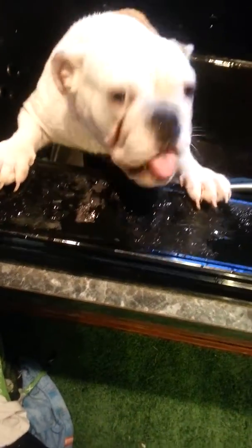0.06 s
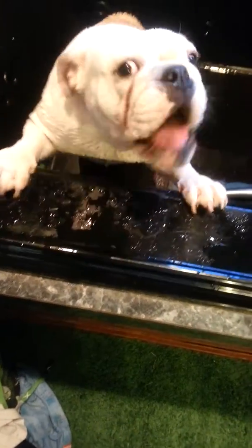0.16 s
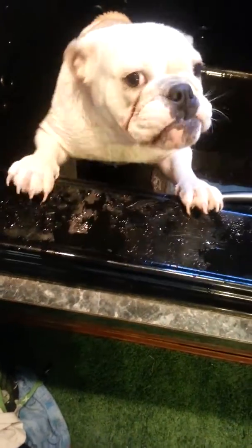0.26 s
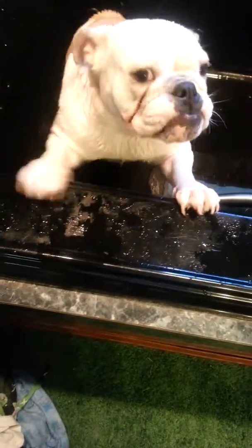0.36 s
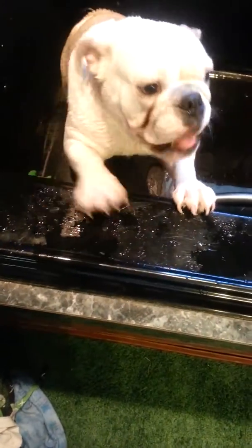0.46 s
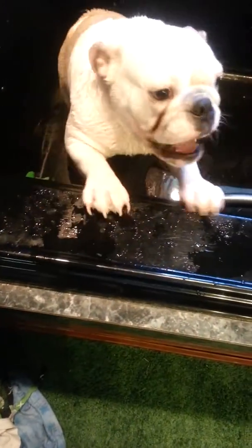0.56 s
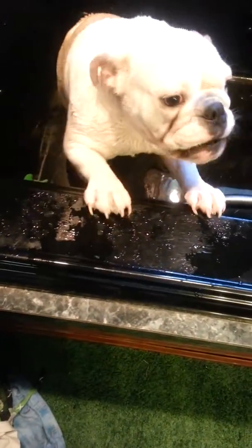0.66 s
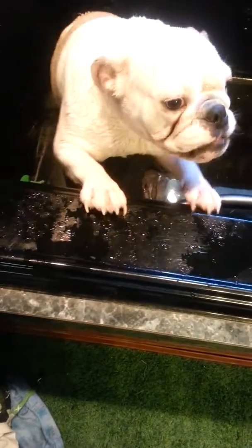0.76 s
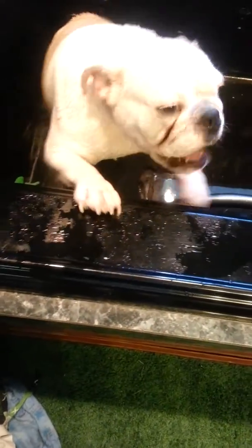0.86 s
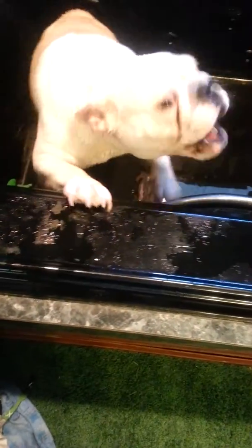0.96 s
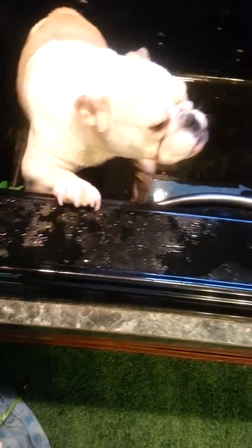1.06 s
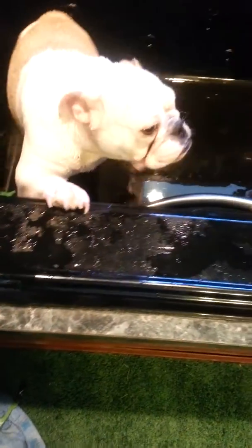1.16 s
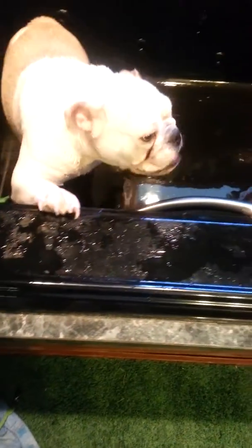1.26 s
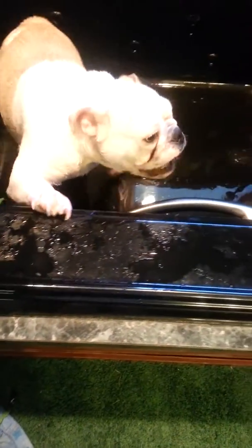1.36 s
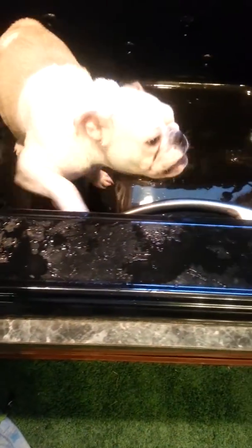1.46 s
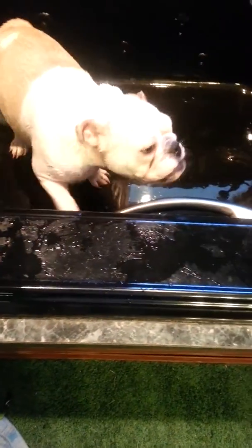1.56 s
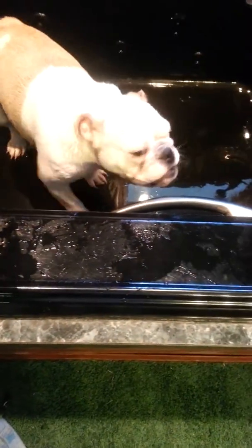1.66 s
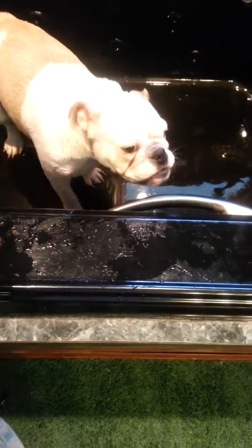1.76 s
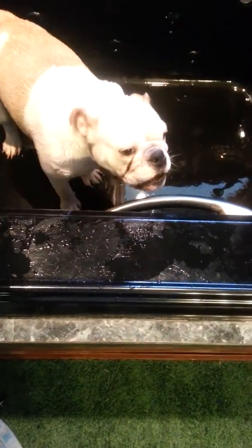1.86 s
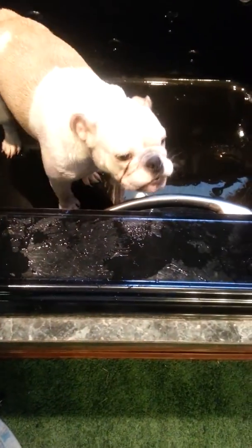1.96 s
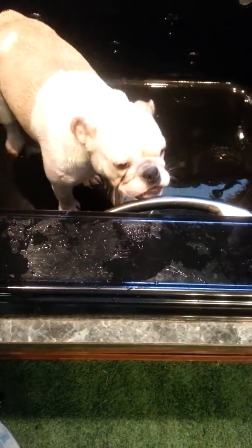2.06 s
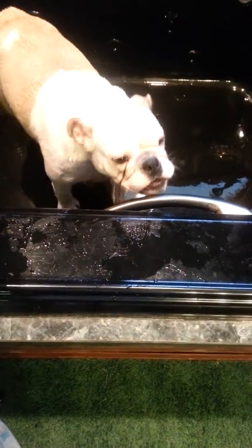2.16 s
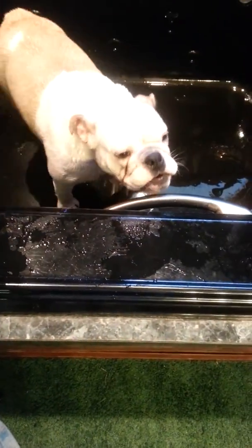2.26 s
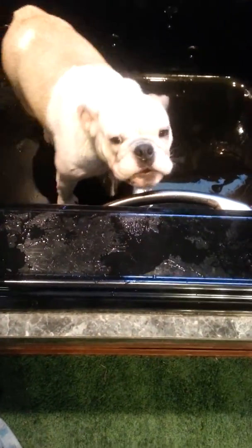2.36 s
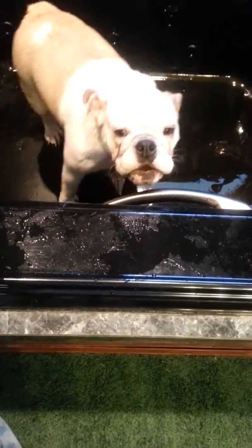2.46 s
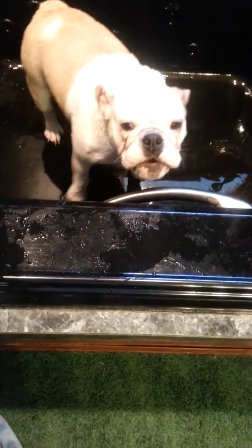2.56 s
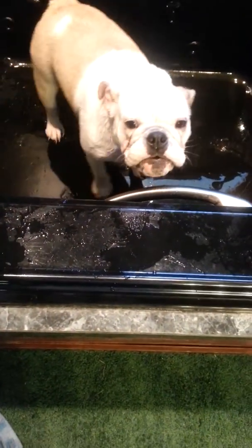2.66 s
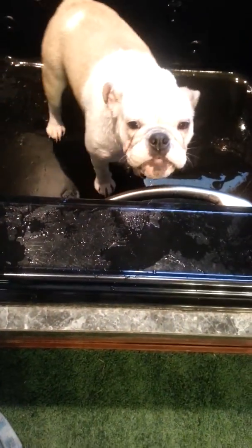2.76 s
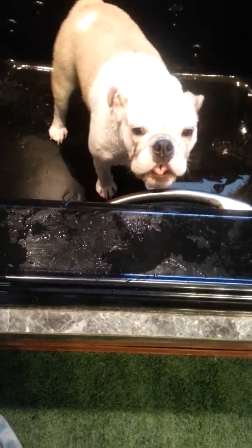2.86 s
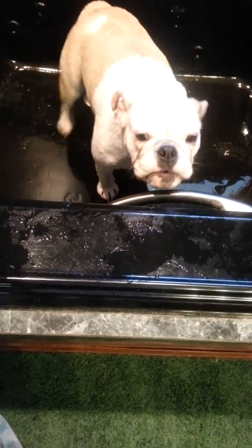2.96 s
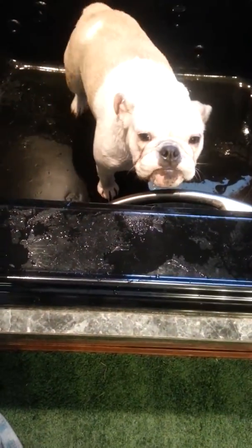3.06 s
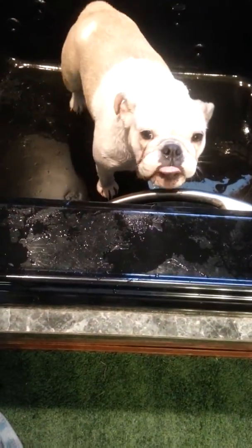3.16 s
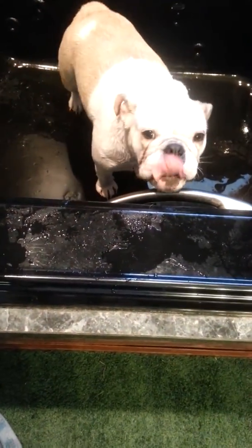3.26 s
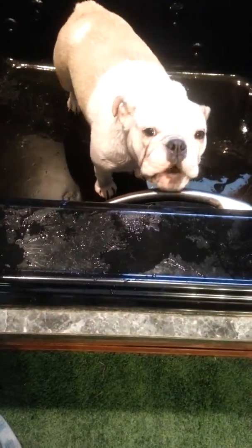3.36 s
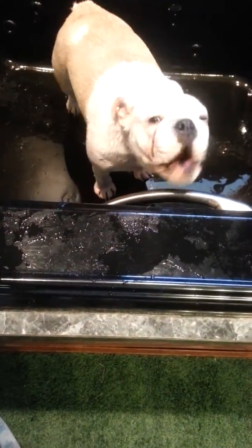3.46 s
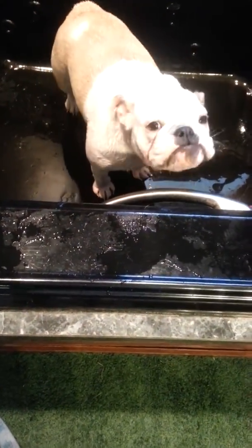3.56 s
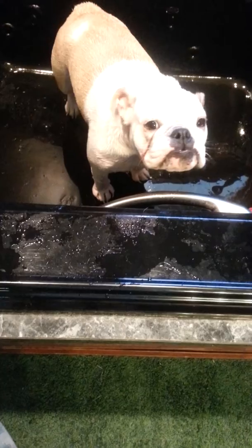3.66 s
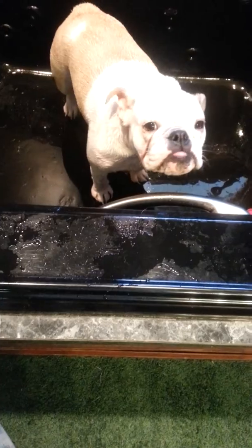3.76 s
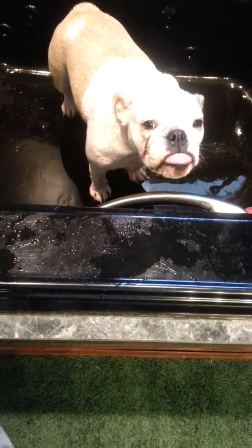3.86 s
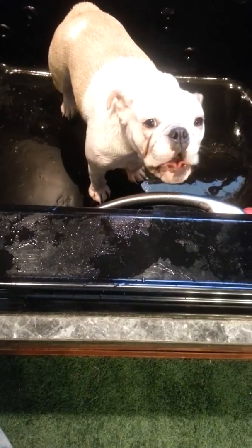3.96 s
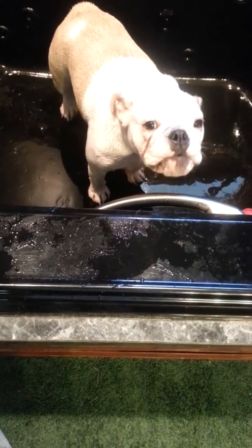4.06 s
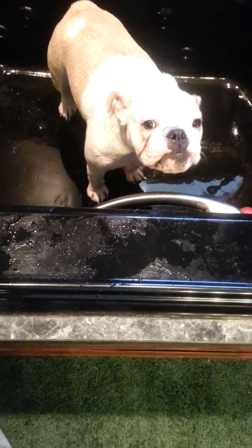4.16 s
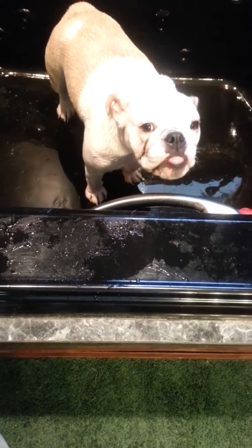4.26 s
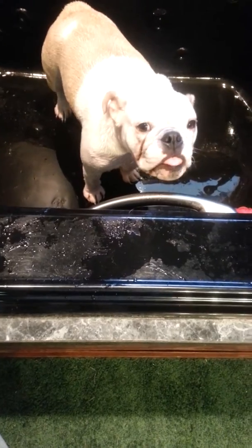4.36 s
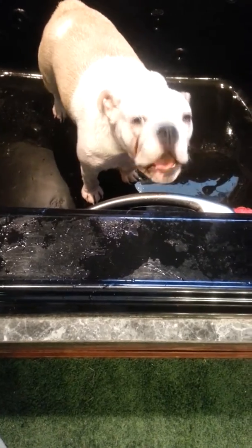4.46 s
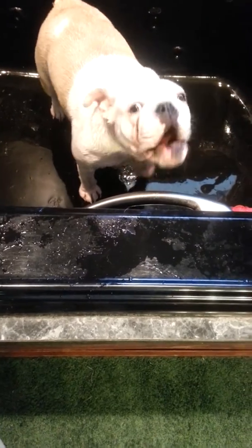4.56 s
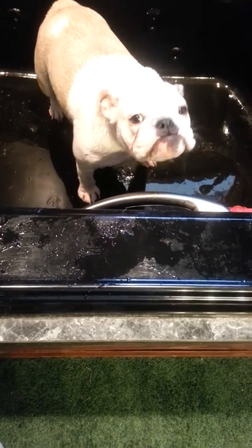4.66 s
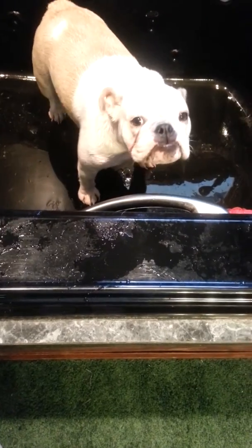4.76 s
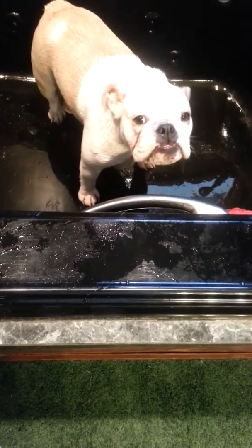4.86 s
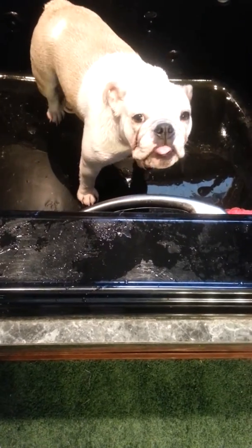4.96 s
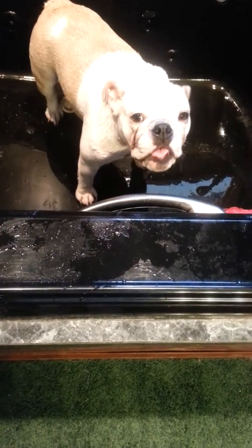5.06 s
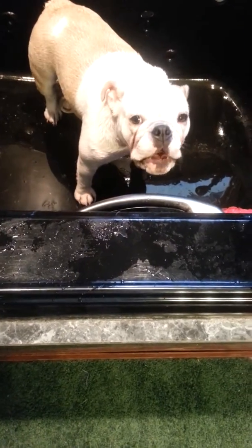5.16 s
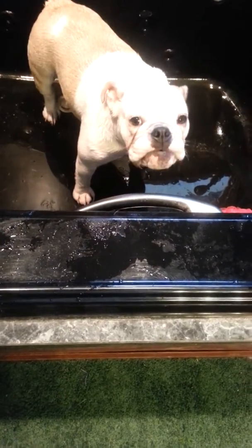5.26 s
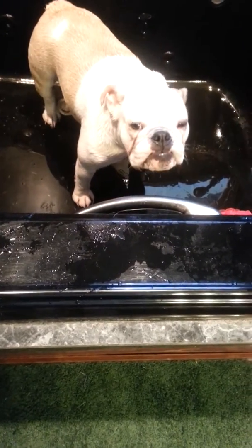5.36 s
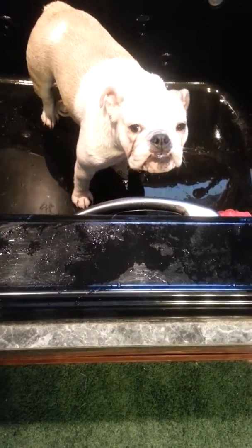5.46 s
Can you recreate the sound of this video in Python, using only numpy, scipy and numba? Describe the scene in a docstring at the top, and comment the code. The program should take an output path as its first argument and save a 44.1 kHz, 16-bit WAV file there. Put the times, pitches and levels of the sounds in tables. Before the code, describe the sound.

Four sharp puppy yaps, a rough fluttering whine and wet snuffling breaths between them, in a small reverberant bathroom.

```python
"""A bulldog puppy in a bathtub snorts and barks twice, whines, then barks twice more in a hard-walled bathroom.
Rough vocal-fold pulses and air ring throat, mouth and head; low pops lead the barks, the soft palate flaps in the whine.
Air bursts make snorts and filtered noise makes snuffles between calls; a resonant low drone trails whine and last bark.
Throughout, dense echoes ring on over a quiet noise bed; loud calls push the gain control and can clip."""
import sys
import numpy as np
from scipy import signal
from scipy.fft import rfft, irfft
from scipy.io import wavfile
from scipy.ndimage import uniform_filter1d
from numba import njit

SR = 44100
rng = np.random.default_rng(int(sys.argv[2]) if len(sys.argv) > 2 else 0)


def wav_record(signal):
    """Record a signal, one row per channel, as 16-bit PCM in the file named by sys.argv[1]."""
    frames = np.transpose(np.atleast_2d(signal))
    bounded = np.clip(frames, -1, 1)
    # unit amplitude maps onto the largest positive 16-bit level
    quanta = np.round(bounded * 32767).astype(np.int16)
    wavfile.write(sys.argv[1], SR, quanta)


N = 242991  # length in samples

# Levels in the tables are relative.
# Room noise colour. Each row: frequency in Hz, level per Hz in dB.
HOUSE_COLOUR = [(35, -25), (60, -9.5), (164, -16), (427, -15.5), (736, -21.5), (1800, -27), (2500, -30.5),
                (9240, -37), (11000, -24.5), (14300, -64), (22000, -120)]
# Echo bands of tub and walls. Each row: centre in Hz, time to fall 60 dB in seconds, level in dB.
ECHO_BANDS = [(255, 0.1, 1), (776, 0.47, 3.5), (1710, 0.33, 10.5), (5560, 0.22, 7.5), (12200, .35, -29)]
# A low wavering drone, perhaps from the chest: two passages. Each row: time in seconds, pitch in Hz, level in dB.
DRONE_PASSAGES = [
    [(2.6, 228.5, -22), (2.664, 221, -36), (2.706, 190, -32.5), (2.778, 168.5, -31), (2.97, 147, -79)],
    [(4.88, 158.2, -40.5), (5.062, 173, -67.5), (5.102, 192, -52), (5.216, 209, -56.5), (5.258, 166, -71.5),
     (5.32, 170, -84)],
]
# Puffs through the narrow nostrils. Each row: loudest moment in seconds, rise in seconds, fall in seconds,
# hiss in dB, nose resonance in dB, rumble in dB.
NOSTRIL_PUFFS = [(0.32, 0.16, 0.067, -28, -54, -43), (0.53, 0.3, 0.28, -45.5, -63, -50),
                 (0.644, 0.11, 0.024, -36.5, -26, -34), (1.17, 0.15, 0.069, -33, -35.5, -39.5),
                 (1.41, 0.053, 0.03, -83, -46, -43), (1.515, 0.11, 0.09, -31, -38.5, -40),
                 (2.86, 0.052, 0.092, -66.5, -59, -50), (3.066, 0.044, 0.14, -55.5, -61.5, -62),
                 (3.3, 0.077, 0.041, -64, -66.5, -53.5), (3.375, 0.04, 0.022, -64, -39.5, -61),
                 (3.66, 0.053, 0.05, -33, -40, -50), (3.93, 0.014, 0.083, -40, -52, -54.5),
                 (4.03, 0.12, 0.15, -61.5, -51.5, -48), (4.33, 0.12, 0.058, -63, -61.5, -73.5),
                 (4.72, 0.053, 0.077, -32, -35.5, -41), (4.86, 0.05, 0.046, -38, -57, -47.5),
                 (5.05, 0.093, 0.08, -65, -62, -63.5), (5.5, 0.15, 0.044, -45.5, -50, -61.5)]
# Short snorts. Each row: start in seconds, level in dB, mouth in Hz, nose in dB, time to fall 60 dB in seconds.
SNORT_BURSTS = [(0.059, -31.5, 570, -12, 0.28), (0.071, -24, 570, -5, 0.1), (0.464, -13, 604, -7, 0.015),
                (0.513, -13.5, 786, -2.5, 0.021), (0.562, -17, 910, -22, 0.027),
                (0.585, -24, 723, -18, 0.16), (0.656, -5, 545, -46, 0.016),
                (1.294, -26.5, 577.8, -30, 0.059), (1.323, -33, 706, -31, 0.055),
                (1.342, -27.5, 764, -20, 0.088), (1.413, -20, 482, -44, 0.054),
                (1.436, -22, 432.4, -8, 0.02), (3.026, -31.5, 440, -23, 0.079),
                (3.059, -36.5, 473, -1, 0.04), (3.178, -40.5, 840, -12, 0.05),
                (3.345, -31, 612, -21.5, 0.078), (3.925, -39.5, 880, 11, 0.033),
                (3.966, -26.5, 752, -16.5, 0.035), (4.024, -22, 575, -24, 0.033),
                (4.102, -29, 421, -26, 0.061), (4.199, -43.5, 628.2, -31, 0.05),
                (4.448, -27.5, 870, -11, 0.22), (4.861, -34, 516, -28.5, 0.076)]
# The soft palate shuts, then lets a puff of voice go. Each row: puff start in seconds, puff level in dB,
# gain when shut in dB (above 0: it stays open).
PALATE_FLAPS = [(1.595, -24.5, -16), (1.636, -16.5, -0.5), (1.675, -7.5, -23.5), (1.709, -8.5, -21),
                (1.754, -7.5, -15), (1.789, -18, -18), (1.817, -11, 1.5), (1.905, -19.5, 13.5),
                (1.982, -16, 4.5), (2.068, -20.5, -16.5), (2.13, -14.5, -11.5), (2.166, -1.5, -9),
                (2.244, -23.5, -9), (2.288, -3.5, -8), (2.392, -5, -18.5), (2.521, -9.5, -6),
                (2.589, -1, -7), (2.631, 1.5, -18.5), (2.698, -1, -33.5), (2.725, -25.5, -7.5)]
# Path of the whine. Each row: time in seconds, pitch in Hz, level in dB, upper mouth in Hz and dB,
# rasp in Hz and dB, lower mouth in dB, middle mouth in dB, roughness from 0 to 1.
WHINE_PATH = [(1.56, 504.6, -17, 2600, -8, 4310, -8, 2.5, -8.5, 0.26),
              (1.596, 506, -2, 2860, 0, 4140, -13, -14, -10, 0.19),
              (1.634, 663.7, -8, 2880, -4, 4550, -9.5, -11.5, -10, 0.2),
              (1.794, 566.8, -17, 2615, -25, 4060, -33.5, -10, -47.5, 0.2),
              (1.858, 645.6, -12, 2770, -0.5, 4140, -6, -8.5, -7.5, 0.37),
              (1.916, 803.7, -12, 2325, 0, 4420, -4.5, -25, -18, 0.22),
              (1.93, 802.2, -27.5, 2673, 7, 4320, -15, -18, 0, 0.2),
              (1.98, 595.8, -14.5, 2447, -15.5, 4230, -14.5, -14, -20.5, 0.38),
              (2.062, 576.4, -13, 2280, -31.5, 4500, -27, -16, -23.5, 0.28),
              (2.146, 646.9, -3.5, 2772, -11, 4070, -23, -13.5, -22.5, 0.27),
              (2.24, 608, -5.5, 2424, -14, 4140, -27, -15.5, -30, 0.23),
              (2.334, 622.3, -3.5, 2547, -16.5, 3810, -22.5, -24, -20, 0.2),
              (2.404, 627.6, -6, 2455, -26, 3860, -28.5, -1, -31.5, 0.26),
              (2.476, 629.7, -6, 2127, -17, 4420, -22.5, -4.5, -21.5, 0.2),
              (2.544, 717.7, -3.5, 2300, -20, 4540, -26.5, -13.5, -19, 0.21),
              (2.556, 674.2, -9, 2110, -5.5, 4833, -14, -13, -9, 0.18),
              (2.694, 614.3, -16, 2087, -24.5, 4970, -31, -13.5, -18.5, 0.26),
              (2.752, 581.7, -25, 2580, -9.5, 4820, -15.5, -9, -30, 0.2),
              (2.77, 631, -29, 2576, -9, 4520, -13, -19.5, -12, 0.15)]
# Shapes of the barks. Each row: start in seconds, length in seconds, pop in dB, level in dB, sag in dB,
# pitch in Hz at the start, after the jump and at the end, time at which the jump is done in seconds,
# lower mouth in Hz and dB, middle mouth in Hz when open and closing, time it takes to settle in seconds,
# its level then in dB, upper mouth in Hz and dB, rasp in Hz, brightness in dB,
# darkening as the jaws close in dB, head cavities in dB, roughness from 0 to 1.
BARK_SHAPES = [(0.083, 0.117, -6, 2.3, -9.5, 760.9, 871.5, 997.2, 0.016, 1160, -6, 2475, 2204, 0.047, -7, 2720, -3.5, 4830, 0, -12.5, 2, 0.38),
               (0.877, 0.15, -44, 0, -2.5, 737.6, 929.6, 629.1, 0.036, 1266, -8, 2316, 1668, 0.098, 4, 3167, 0.5, 4060, 1, -14, -2.5, 0.34),
               (3.387, 0.123, -27.5, 2.8, -0.5, 619.9, 790.5, 671.4, 0.054, 1287, -13, 1949, 1622, 0.037, 1, 3099, 1, 4365, -3, -19, -8.5, 0.3),
               (4.471, 0.12, -17, 2.25, -6, 847.7, 889.8, 717.7, 0.021, 1251, -9.5, 2274, 1961, 0.089, -5.5, 3082, -1, 4620, -1, -11.5, -2.5, 0.49)]
# Fixed cavities of head and tub. Each row: centre in Hz, width in Hz, level in dB.
CAVITIES = [(270, 100, -20), (500, 140, -14)]
# Tone of the left port against the right. Each row: frequency in Hz, left minus right in dB.
PORT_SHADE = [(100, -0.5), (500, -0.5), (1000, -2), (2000, 5.5), (4000, 7.5), (8000, -8), (12000, 1)]
# Microphone tone. Each row: frequency in Hz, gain in dB.
MICROPHONE_TONE = [(3000, 1.5), (5000, 6.5), (9000, 0), (12000, -6.5), (15000, -10.5)]


def undb(db):
    """Gain of a level in dB."""
    return 10 ** (np.asarray(db) / 20)


def unit(x):
    """Scale to rms 1."""
    return x / np.sqrt(np.mean(x ** 2))


def read_paths(paths, fade_s):
    """Columns of the paths on the sample grid, and a gate that is open inside each path."""
    t, rows = np.arange(N) / SR, np.concatenate(paths)
    gate = sum(np.clip(np.minimum(t - p[0][0], p[-1][0] - t) / fade_s, 0, 1) for p in paths)
    return [np.interp(t, rows[:, 0], column) for column in rows.T[1:]], gate


def colour(x, points):
    """Filter by (Hz, dB) points joined on a log-frequency axis."""
    hz, db = np.transpose(points)
    f = np.arange(x.shape[-1] // 2 + 1) * SR / x.shape[-1] + 1
    gain = undb(np.interp(np.log(f), np.log(hz), db))
    return irfft(rfft(x) * gain, x.shape[-1])


@njit
def state_variable(x, hz, width):
    """State-variable band-pass with moving centre and width, gain 1 at the centre."""
    y, b, l = np.empty(len(x)), 0., 0.
    for i in range(len(x)):
        g, k = np.tan(np.pi * hz[i] / SR), width[i] / hz[i]
        v = (b + g * (x[i] - l)) / (1 + g * (g + k))
        b, l, y[i] = 2 * v - b, l + 2 * g * v, k * v
    return y


def band(x, hz, width):
    """Band-pass with a number or a curve for centre and width in Hz."""
    return state_variable(x, np.clip(hz, 20, .4 * SR) * np.ones(len(x)), width * np.ones(len(x)))


def ring(x, hz, width):
    """A steep resonance: the band-pass twice."""
    return band(band(x, hz, width), hz, width)


def house():
    """A quiet bed of steady coloured noise, independent at each port."""
    level_db = -53.5
    return undb(level_db) * unit(colour(rng.standard_normal((2, N)), HOUSE_COLOUR))


def bathroom(x):
    """Dense echoes that die band by band; both ports hear the same bass but unrelated treble."""
    level_db, alike_hz = -1.5, 900
    t = np.arange(SR) / SR
    mid, side = rng.standard_normal((2, SR))
    side = signal.sosfilt(signal.butter(1, alike_hz, "high", fs=SR, output="sos"), side)
    rise = np.clip(t / 0.01, 0, 1)
    tails = []
    for noise in (mid + side, mid - side):
        bands = [undb(db - 60 * t / t60) * band(noise, hz, 1.34 * hz) for hz, t60, db in ECHO_BANDS]
        tails.append(sum(bands) * rise)
    echo = undb(level_db) * unit(np.array(tails)) / np.sqrt(SR)
    return signal.fftconvolve(x[None], echo, axes=1)[:, :N]


def drone():
    """A narrow low resonance stirred by noise."""
    (hz, db), gate = read_paths(DRONE_PASSAGES, 0.061)
    return gate * undb(db) * unit(ring(rng.standard_normal(N), hz, 38))


def snuffles():
    """Turbulent air in the nostrils over a low wet rumble that flutters in the throat."""
    edge_db = -15  # level one rise or fall time from the loudest point
    nose_hz, rumble_hz = 2640, 292
    t, gain = np.arange(N) / SR, np.zeros((3, N))
    for s, rise, fall, *db in NOSTRIL_PUFFS:
        away = np.maximum((s - t) / rise, (t - s) / fall)
        swell = undb(edge_db * away) * np.clip(2 - away, 0, 1)
        gain += undb(db)[:, None] * swell
    air = rng.standard_normal((4, N))
    hiss = unit(band(air[0], 3500, 8600))
    nose = unit(ring(air[1], nose_hz, 1100))
    flutter = undb(0.57 * unit(band(air[3], 30, 50)))
    rumble = unit(ring(air[2], rumble_hz, 100)) + 1.61 * unit(band(air[2], 540, 570))
    return gain[0] * hiss + gain[1] * nose + gain[2] * flutter * rumble


def snorts():
    """Each snort is a burst of air that rings throat and mouth, with a hiss from the nose."""
    throat_hz, throat_db = 282, 1.5
    out, t = np.zeros(N + SR), np.arange(SR // 4) / SR
    bursts = rng.standard_normal((len(SNORT_BURSTS), SR // 4))
    for (s, db, mouth_hz, nose_db, ring_s), air in zip(SNORT_BURSTS, bursts):
        fade = np.exp(-np.log(1000) * t / ring_s) * np.clip(t / .002, 0, 1)
        mouth = 1.25 * np.sin(2 * np.pi * mouth_hz * t) + 0.51 * unit(band(air, mouth_hz, 350))
        throat = undb(throat_db) * np.sin(2 * np.pi * throat_hz * t)
        nose = undb(nose_db) * unit(band(air, 3000, 1600))
        i = int(s * SR)
        out[i:i + len(t)] += undb(db) * fade * (mouth + throat + nose)
    return out[:N]


def pops():
    """The lips part with a short low thud of air that leads each bark."""
    pop_hz, ring_s, lead_s = 192, 0.02, 0.0041
    out = np.zeros(N)
    for s, _, db, *_ in BARK_SHAPES:
        age = np.clip(np.arange(N) / SR - s + lead_s, 0, None)
        out += undb(db - 60 * age / ring_s) * np.sin(2 * np.pi * pop_hz * age)
    return out


def palate():
    """Gain dips while the palate is shut, and the puffs that follow."""
    shut_s, puff_peak_s = 0.012, 0.007
    t, shut_db, puffs = np.arange(N) / SR, np.zeros(N), np.zeros(N)
    for s, puff_db, db in PALATE_FLAPS:
        shut_db += min(db, 0) * np.exp(-((t - s + shut_s / 2) / shut_s) ** 2)
        age = np.clip(t - s, 0, 1) / puff_peak_s
        puffs += undb(puff_db) * age * np.exp(1 - age)
    return undb(shut_db), puffs


def whine():
    """Voice controls of the whine: the lower and middle mouth resonances stay put, the upper one moves."""
    lower_hz, middle_hz, head_db, growl = 809, 1746, -1, 0.55
    return [(s, hz, db, lower_hz, lower_db, middle_hz, middle_db, upper, upper_db, rasp, rasp_db,
             head_db, rough, growl)
            for s, hz, db, upper, upper_db, rasp, rasp_db, lower_db, middle_db, rough in WHINE_PATH]


def bark(s, length, pop_db, db, sag, hz0, hz1, hz2, jump, lower, lower_db, middle0, middle1, settle,
         middle_db, upper, upper_db, rasp, bright, close, head_db, rough):
    """Voice controls of one bark: a quick attack, a jump in pitch, a sag while the jaws close, a release."""
    attack_s, release_s, jump_s = 0.026, 0.03, 0.014
    onset_db, end_db = -6.5, -10.5  # start against the level, end against the sag
    dull_onset_db = -8.5  # the jaws are still opening
    rasp_db, growl = -3, 0.26
    hold, held = length - release_s, max(jump - jump_s, 0)
    age = np.unique([0, attack_s, held, jump, settle, hold, length])
    hz = np.interp(age, [held, jump, length], [hz0, hz1, hz2])
    level = db + np.interp(age, [0, attack_s, hold, length], [onset_db, 0, sag, sag + end_db])
    opening = np.interp(age, [0, attack_s], [dull_onset_db, 0])
    shine = bright + opening + np.interp(age, [attack_s, length], [0, close])
    middle = np.interp(age, [attack_s, settle], [middle0, middle1])
    ringing = opening + np.interp(age, [attack_s, settle, length], [bright, middle_db, middle_db + close])
    return [(s + t, f, l, lower, lower_db + o, m, r, upper, e + upper_db, rasp, e + rasp_db,
             head_db, rough, growl)
            for t, f, l, o, m, r, e in zip(age, hz, level, opening, middle, ringing, shine)]


@njit
def folds(hz, jitter, shimmer, chance):
    """Vocal folds pulse at each wrap of the phase; each cycle has its own length and size."""
    pulses, phase, p, k = np.zeros(len(hz) + 1), np.empty(len(hz)), 0., 0
    for i in range(len(hz)):
        step = hz[i] * np.exp(jitter[i] * chance[k, 0]) / SR
        p += step
        if p >= 1:
            p, k = p - 1, k + 1
            size = np.exp(shimmer[i] * chance[k, 1]) / step
            # the pulse is shared between two samples
            pulses[i] += size * p / step
            pulses[i + 1] += size * (1 - p / step)
        phase[i] = p
    return pulses[:-1], phase


def voice():
    """Uneven pulses and cycle-gated air ring the throat at the pitch, the moving mouth and the fixed cavities."""
    paths = sorted([bark(*shape) for shape in BARK_SHAPES] + [whine()])
    (hz, db, *mouth, rasp_hz, rasp_db, head_db, rough, growl), gate = read_paths(paths, 0.0027)
    rough = np.clip(rough, 0, 1)
    pulses, phase = folds(hz, .1 * rough, 2.42 * rough, rng.standard_normal((N // 20, 2)))
    # the false folds swing unevenly at under a third of the pitch and add side lines
    wander = unit(uniform_filter1d(rng.standard_normal(N), 300))
    slow = np.cos(2 * np.pi * np.cumsum(hz / 3.6 * (1 + 0.0967 * wander)) / SR)
    swing = 1 + 1.58 * np.clip(growl, 0, 1) * slow
    air = rng.standard_normal(N) * np.exp(-phase / 0.6)
    source = (unit(pulses) + 2.64 * rough * unit(air)) * swing

    shut, puffs = palate()
    effort = gate * (undb(db) * shut + puffs)

    # rough airflow blurs the mouth resonances
    widths = [w * (0.55 + 1.2 * rough) for w in (300, 400, 420)]
    throat = (hz, 240, -3)
    cavities = [(f, w, d + head_db) for f, w, d in CAVITIES]
    tract = [throat, *zip(mouth[::2], widths, mouth[1::2]), *cavities]
    # the effort drives the resonances, so that they round its edges
    voiced = sum(undb(d) * ring(effort * source, f, w) / np.std(ring(source, f, w)) for f, w, d in tract)

    rasp = unit(band(air, 7100, 12000)) + 0.65 * unit(ring(air, rasp_hz, 1600))
    # the fundamental of the folds, beside the rough throat ring
    clear = undb(-5) * band(effort * unit(np.sin(2 * np.pi * phase)), hz, 600)
    return voiced + clear + effort * undb(rasp_db - 5) * rasp


def ports(dog, echoes):
    """The dog reaches the right port first, then the left; the phone's body gives each port its own tone."""
    left_lag = 6  # samples
    left, right = np.array([np.roll(dog, left_lag), dog]) + echoes
    half = np.array(PORT_SHADE) * [1, .5]  # half the difference on each side
    return np.array([colour(left, half), colour(right, half * [1, -1])])


def scene():
    """The dog calls, snorts and snuffles; the walls answer over a quiet house."""
    dog = undb(1.0) * voice() + pops() + snorts() + snuffles() + drone()
    return ports(dog, bathroom(dog)) + house()


@njit
def follow(x, attack, release):
    """Level follower with separate speeds for rise and fall."""
    e, out = 0., np.empty(len(x))
    for i in range(len(x)):
        e += (x[i] - e) * (attack if x[i] > e else release)
        out[i] = e
    return out


def gain_control(x):
    """One gain for both ports leans on whatever rises above the threshold."""
    top_db, ratio, attack_s, release_s = -9.5, 2.256, 0.032, 0.029
    loud = follow(np.abs(x).max(axis=0), 1 / (attack_s * SR), 1 / (release_s * SR))
    return x * np.maximum(loud / undb(top_db), 1) ** (1 / max(ratio, 1) - 1)


def record(dry):
    """The microphones cut the deep bass, gain control leans on loud calls, peaks clip, the top droops and is cut."""
    top_hz = 15600
    x = signal.sosfilt(signal.butter(2, 120, "high", fs=SR, output="sos"), dry)
    x = np.clip(gain_control(x), -.98, 1.)
    x = colour(x, MICROPHONE_TONE)
    return signal.sosfilt(signal.ellip(8, .2, 70, top_hz, fs=SR, output="sos"), x)


dry = scene()
out = record(dry)
wav_record(out)
```